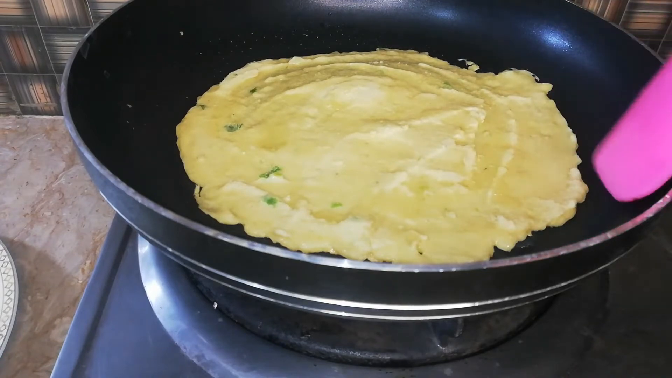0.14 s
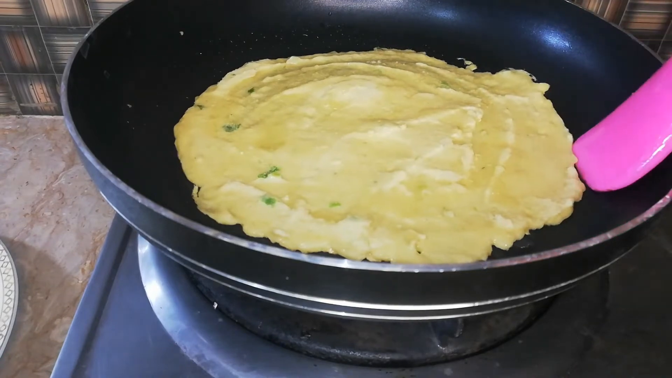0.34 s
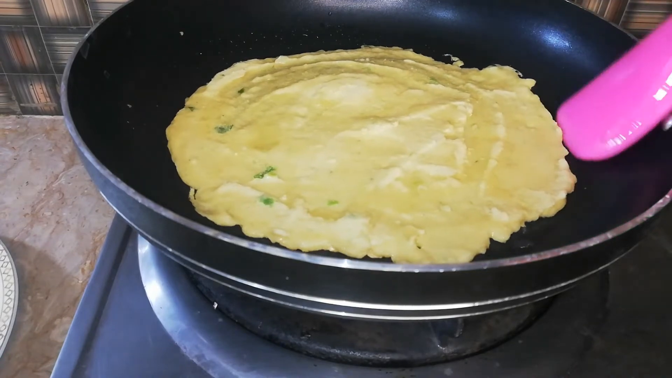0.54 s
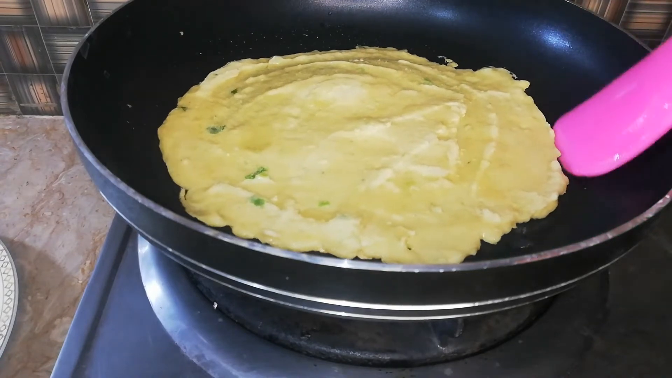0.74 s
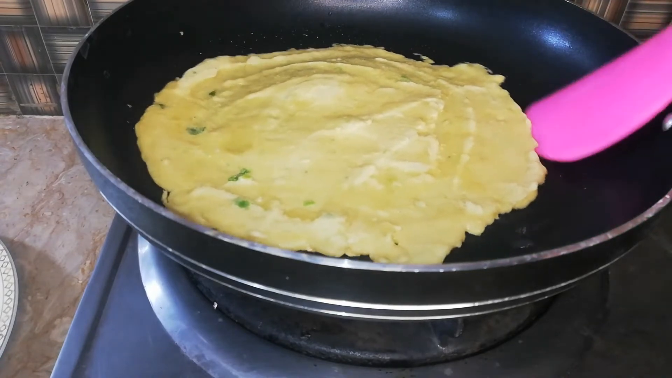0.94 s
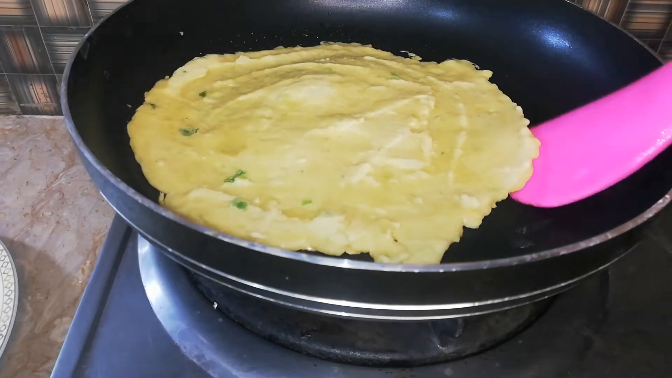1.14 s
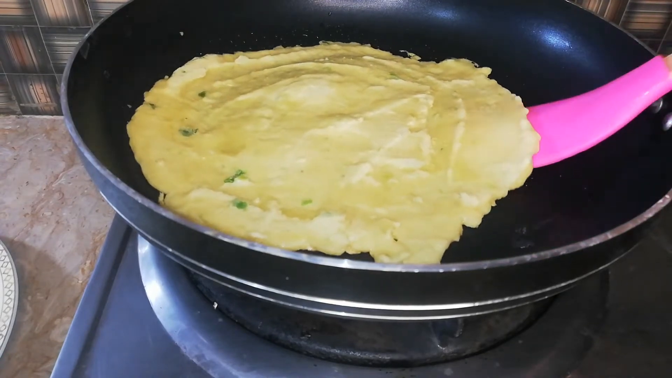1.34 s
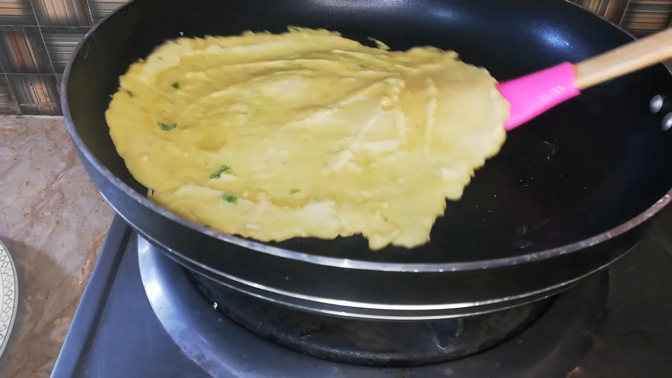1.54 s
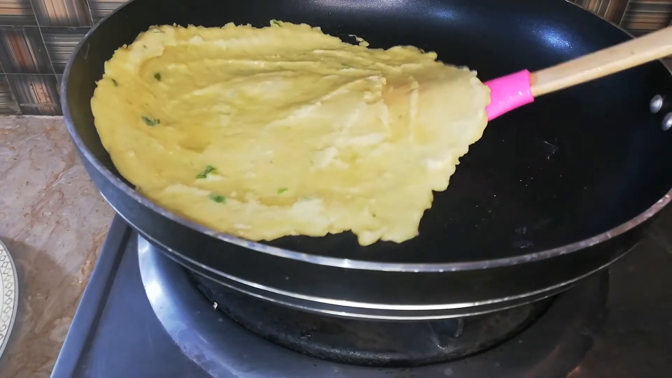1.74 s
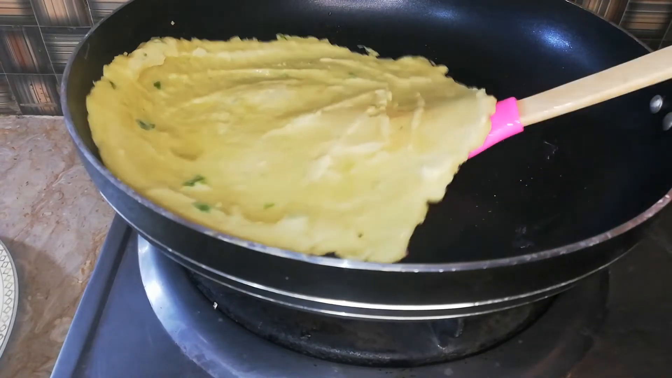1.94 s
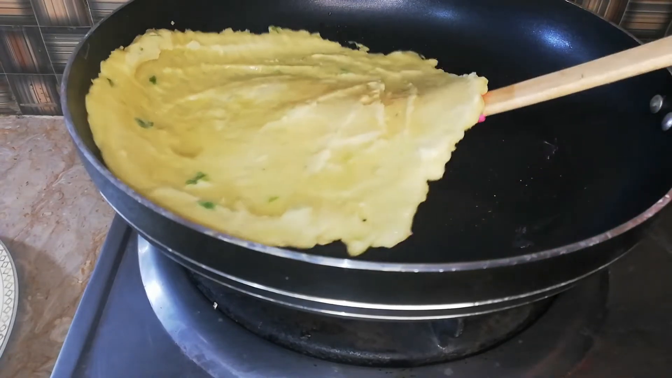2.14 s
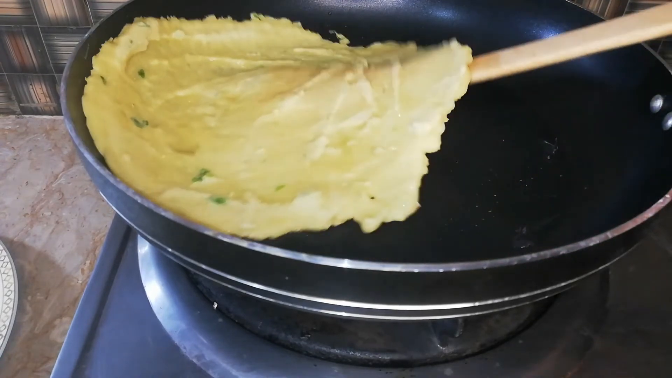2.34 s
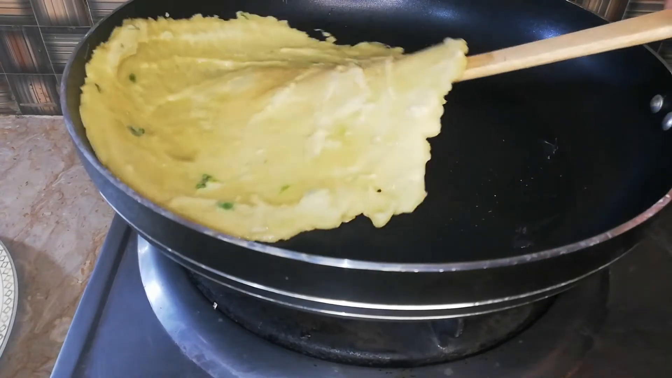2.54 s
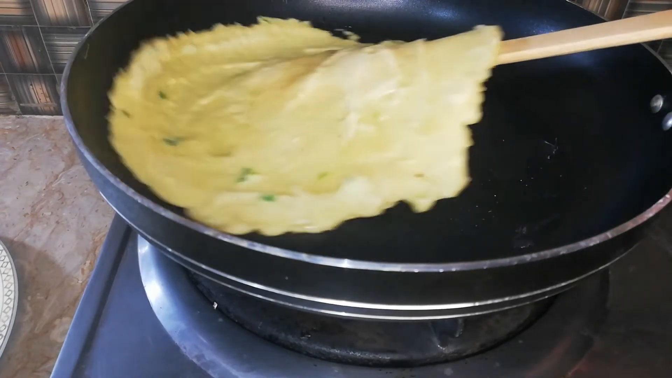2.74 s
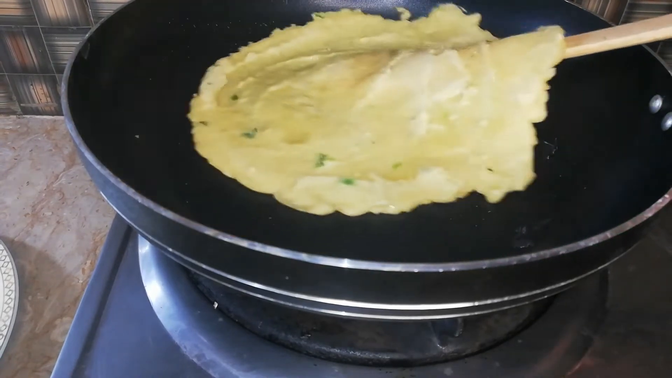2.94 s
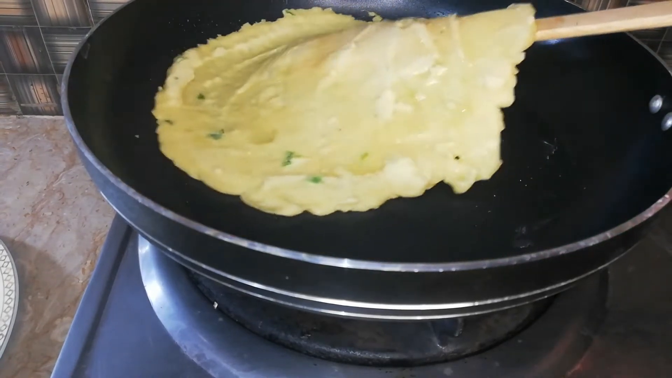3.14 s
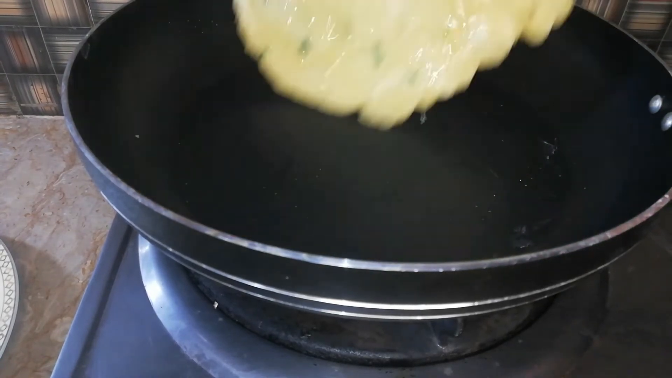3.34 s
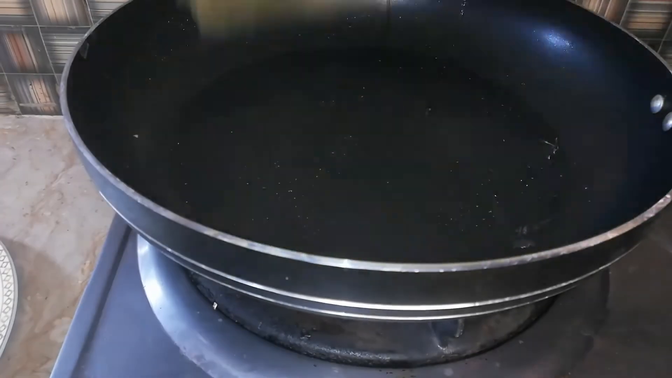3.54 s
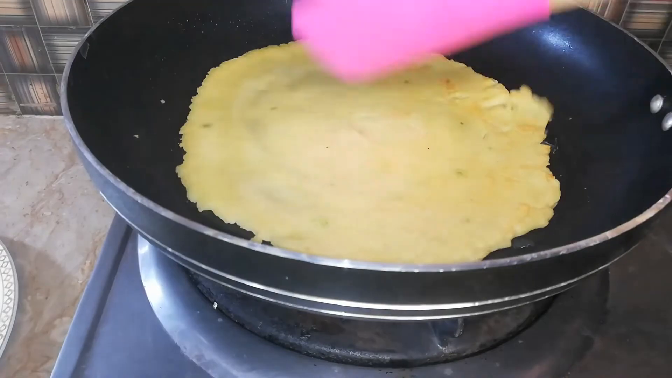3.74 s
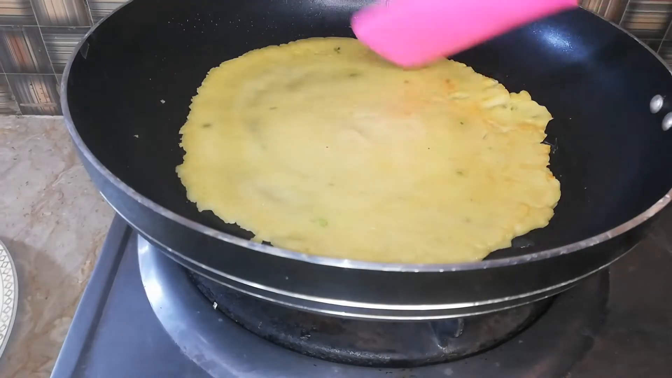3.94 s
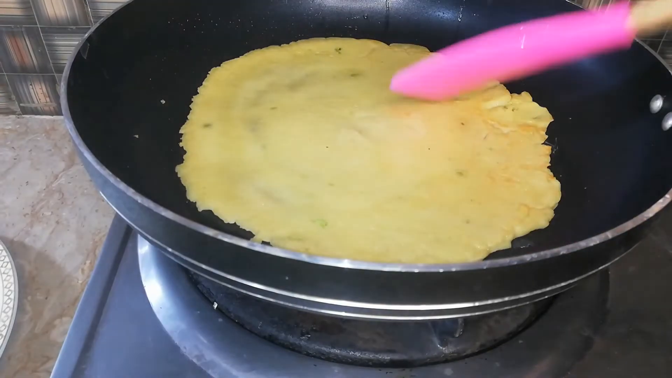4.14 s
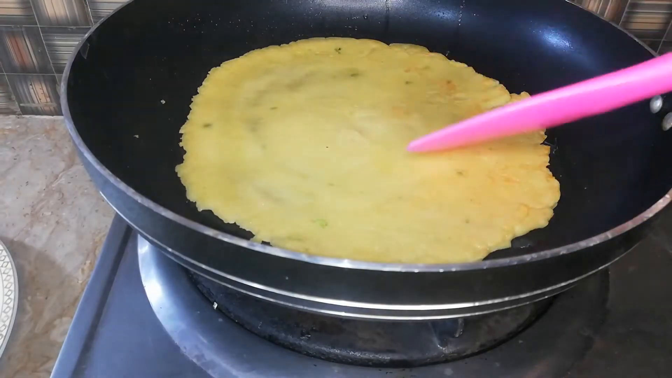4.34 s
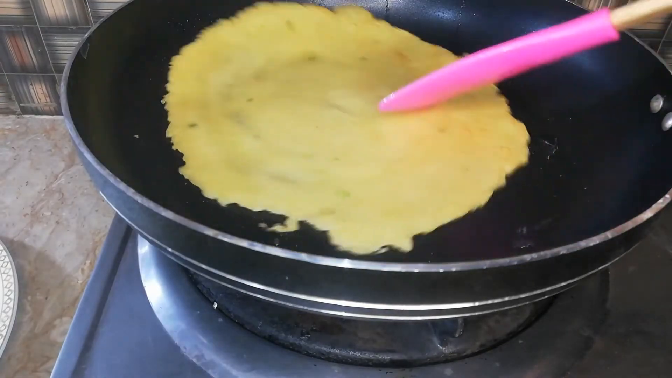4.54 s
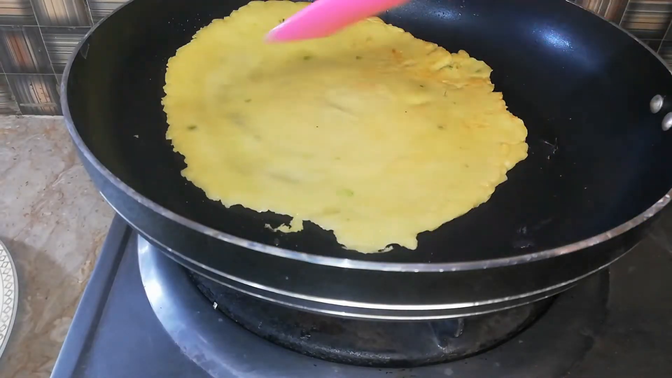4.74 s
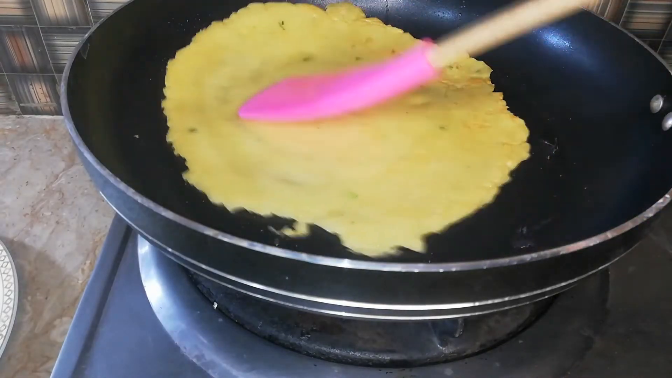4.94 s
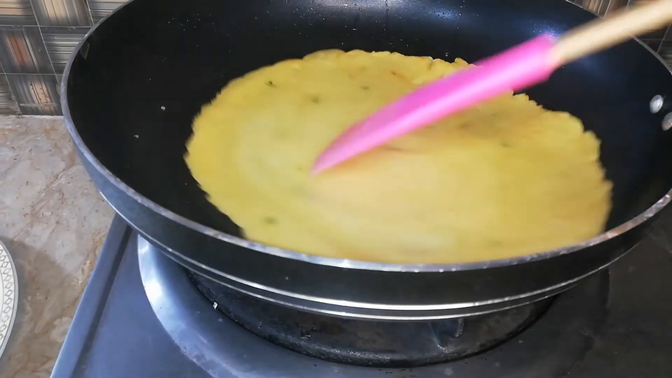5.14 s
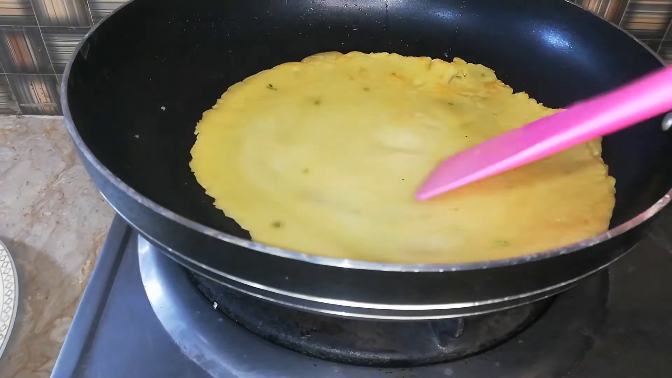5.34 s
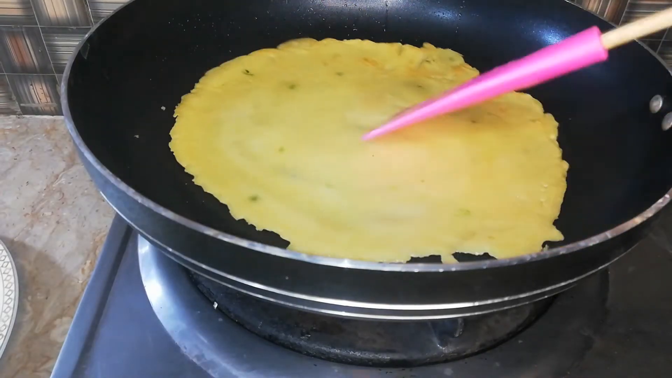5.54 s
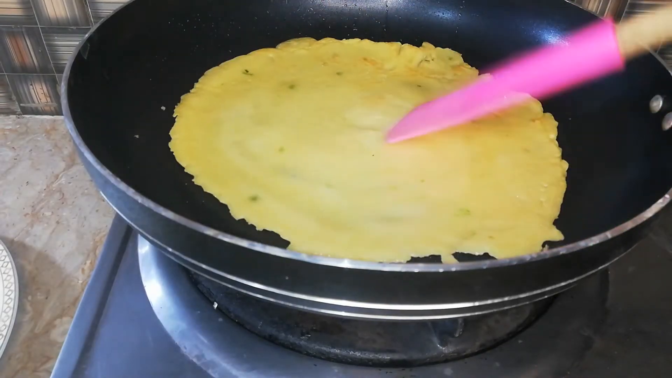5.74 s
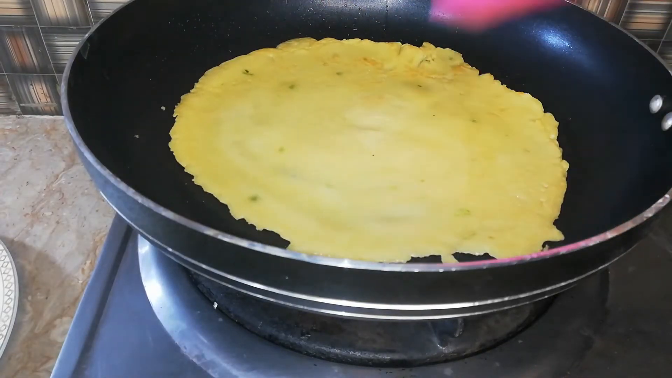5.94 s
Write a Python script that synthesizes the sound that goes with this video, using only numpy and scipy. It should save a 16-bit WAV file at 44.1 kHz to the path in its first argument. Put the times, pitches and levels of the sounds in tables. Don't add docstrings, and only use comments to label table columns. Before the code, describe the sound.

A gas burner runs throughout with low rumble, soft airy hiss and a very thin high whistle, in a small kitchen heard close to the pan. The first 0.9 seconds hold little else. Around 1.0 a soft spatula touches the steel, rubbing, ticking and squeaking, and firm dull tocks cluster from 1.3 to 1.5 as the pan knocks its trivet and rattles the stove. From 1.5 to 3.3 come lighter oily sliding, sharp little spits, a catch near 2.1, a light knock at 2.9 and faint squeals as the crepe lifts. The sizzle dips briefly at 3.4. At 3.6 the crepe slaps down in wet folds, by far the loudest event, with a booming, metallic ring and a puff of steam. Rebound knocks and clinks follow until 3.9, then soft rubbing, faint squeaks, frequent crackling droplets and slowly rising simmer to 6.1.

```python
import sys
import numpy as np
from scipy import signal
from scipy.fft import rfft, irfft, next_fast_len
from scipy.io import wavfile
from scipy.ndimage import uniform_filter1d, map_coordinates

SR = 44100
rng = np.random.default_rng(int(sys.argv[2]) if len(sys.argv) > 2 else 0)


def dump_mix(stems):
    frames = np.atleast_2d(stems).T
    limited = np.clip(frames, -1, 1)
    pcm = np.round(limited * 32767).astype(np.int16)
    wavfile.write(sys.argv[1], SR, pcm)


def ratio_of_db(decibels):
    return 10 ** (np.asarray(decibels, float) / 20)


N = 268569
T = np.arange(N) / SR


def unit(x):
    return x / np.sqrt(np.mean(x ** 2) + 1e-20)


def along(points, hz):
    f, v = np.transpose(points)
    return np.interp(np.log(hz + 1), np.log(f + 1), v)


def curves(rows):
    s, *columns = np.transpose(rows)
    return [np.interp(T, s, column, left=-120) for column in columns]


def wobble(rate, size=N):
    knots = rng.standard_normal(int(size * rate / SR) + 4)
    return map_coordinates(knots, [T[:size] * rate])


def filtered(x, response):
    m = next_fast_len(N + SR // 2)
    return irfft(rfft(x, m) * response(np.fft.rfftfreq(m, 1 / SR)), m)[..., :N]


def ringing(modes, damp):
    def response(f):
        total = 0
        for k, (hz, db, t60) in enumerate(modes):
            width = np.log(1000) / np.pi / (t60 * damp)
            total = total + (-1) ** k * ratio_of_db(db) * 1j * f / (hz * hz - f * f + 1j * f * width)
        return total
    return response


def patches(depth_db):
    z = signal.stft(rng.standard_normal((2, N)), nperseg=512)[2]
    field = uniform_filter1d(rng.standard_normal(z.shape[1:]), size=5, axis=0)
    field = uniform_filter1d(field, size=7, axis=1)
    return signal.istft(z * ratio_of_db(depth_db * unit(field)), nperseg=512)[1][:, :N]


def ports(side, spectrum, grain, patchy_db=0):
    def shape(hz):
        return ratio_of_db(along(spectrum, hz)) * [1 + 0 * hz, ratio_of_db(along(side, hz))]
    mid, diff = filtered(grain * patches(patchy_db), shape)
    return np.array([mid + diff, mid - diff]) / np.sqrt(np.mean(mid ** 2))


def grains(share, spread_db):
    height = np.clip(rng.exponential(size=N), 0, 2.3)
    return 1 + (rng.random(N) < share) * ratio_of_db(spread_db * height)


def bursts(rows, rise):
    out, t = np.zeros(N + SR), np.arange(SR // 2) / SR
    for s, db, t60 in rows:
        out[round(s * SR):][:len(t)] += ratio_of_db(db - 60 * t / t60) * np.clip(t / rise, 0, 1)
    return out[:N]


def swells(rows):
    return sum(ratio_of_db(db - 17 * np.where(T < s, (s - T) / swell, (T - s) / fade)) for s, db, swell, fade in rows)


# frequency [Hz], t60 [s].
ROOM_DECAY = [(200, 0.46), (1500, 0.45), (6000, 0.38), (14000, 0.37)]


def kitchen(x):
    hz, t, z = signal.stft(rng.standard_normal((2, SR // 2)), SR, nperseg=256)
    decay = ratio_of_db(-60 * t / along(ROOM_DECAY, hz)[:, None])
    tail = signal.istft(z * decay, SR, nperseg=256)[1]
    late = np.pad(x, ((0, 0), (130, 0)))
    return signal.fftconvolve(late, tail / np.linalg.norm(tail[0]), axes=1)[:, :N]


# frequency [Hz], side minus mid [dB].
FAR_WIDTH = [(60, -25), (110, -22), (200, -8.5), (380, 1.5), (700, 1), (1290, -8), (2380, -1), (4400, 0.5),
             (8120, 0.5), (15000, 0)]
# frequency [Hz], density [dB per Hz].
RUMBLE_COLOR = [(12, -42), (20, -18), (43, 3.5), (76, -3), (140, -0.5), (233, -19.5), (287, -14.5),
                (404, -16), (462, -24), (536, -39), (700, -19.5), (910, -12), (1540, -120)]
# frequency [Hz], density [dB per Hz].
JET_HISS = [(350, -12.5), (600, -11.5), (1010, -6.5), (1230, -1), (1550, -3.5), (2540, -8), (4280, -8),
            (5330, -7.5), (7020, -6.5), (16000, -19.5)]
# time in seconds [s], level [dB].
SIMMER_LEVEL = [(0, -0.5), (1, 1), (3.3, -0.5), (3.42, -3.5), (3.58, -4), (3.7, -2.5), (6.09, 3.5)]
# pitch [Hz], level [dB].
JET_WHISTLES = [(6046, -74), (5630, -84), (8008, -82)]


def burner():
    whistle = 0
    for hz, db in JET_WHISTLES:
        whistle = whistle + ratio_of_db(db + 2.1 * wobble(7.9)) * np.sin(2 * np.pi * hz * T + .9 * wobble(40))
    rumble = ratio_of_db(-63.5 + 0.98 * wobble(4.29)) * ports(FAR_WIDTH, RUMBLE_COLOR, 1)
    hiss_db = -60 + curves(SIMMER_LEVEL)[0] + .3 * wobble(3)
    hiss = ratio_of_db(hiss_db) * ports(FAR_WIDTH, JET_HISS, 1, patchy_db=1.5)
    return rumble + hiss + whistle


# pitch [Hz], level [dB], t60 [s].
STOVE_MODES = [(68.4, -10.5, 0.93), (95.7, -6.5, 1), (157.8, 0, 0.5), (184, 2, 0.24), (228.4, 1.5, 0.38),
               (269.6, -5, 0.99), (312.6, -3.5, 0.26), (408.4, -6.5, 0.6), (500, -23, 0.28)]


def stove(push, damp):
    return filtered(push, ringing(STOVE_MODES, damp))


# peak time [s], peak level [dB], swell [s], fade [s].
JOLT_MOVES = [(.2, -65, 0.14, 0.18), (1.08, -59, 0.085, 0.061), (1.34, -48, 0.068, 0.14),
              (1.45, -43, 0.18, 0.096), (2.43, -85, 0.38, 0.16), (2.69, -57, 0.018, 0.089),
              (2.97, -55.5, 0.09, 0.047), (3.45, -63, 0.031, 0.016), (3.61, -32.5, 0.0047, .11),
              (3.72, -43.5, .03, 0.075), (3.845, -44, 0.019, 0.092), (4.04, -54.5, 0.02, 0.043),
              (4.49, -67, 0.063, 0.034), (4.64, -57.5, 0.034, 0.032), (4.85, -64, 0.064, 0.19),
              (5.35, -58, 0.054, 0.3), (5.78, -66, 0.26, 0.22)]


def shaking():
    level = ratio_of_db(-70.5 + 4.4 * wobble(4.66)) + swells(JOLT_MOVES)
    return ratio_of_db(-6) * level * unit(stove(rng.standard_normal(N), damp=0.3))


# start [s], peak level [dB], pitch [Hz], left minus right [dB].
OIL_SPITS = [(0.538, -45, 6100, 4), (1.5091, -36.5, 5300, 4), (1.5616, -42, 9200, 7),
             (1.8364, -38, 8600, 8), (1.9926, -43, 9500, 9), (2.1017, -29, 11200, -9),
             (2.2008, -34.5, 7400, 6), (2.343, -39.5, 7300, 10), (2.5919, -38, 9000, 3.5),
             (2.6495, -38, 7200, -4), (2.6927, -39, 5300, -6), (2.7355, -42, 5300, -5),
             (3.103, -41, 7800, 7), (3.7689, -35, 7500, 6), (3.8057, -31.5, 7050, 5),
             (3.8548, -35, 5000, 7), (3.9757, -36, 7980, 6), (4.2446, -41, 7100, 3), (4.4005, -38, 7800, 4),
             (4.4827, -31.5, 7200, 7), (4.5747, -44, 8400, 8), (4.589, -42, 10800, 7),
             (4.5931, -43, 8600, 9), (4.712, -43, 9600, -2), (4.7706, -41, 5600, 2), (4.7783, -45, 5400, 9),
             (4.8087, -39.5, 10000, 5), (4.816, -39, 9500, 9), (4.8306, -44, 6500, 8),
             (4.9055, -41, 3300, -2), (4.9204, -41, 3400, 0), (4.9654, -43, 7600, -4),
             (5.0442, -37, 7800, 8), (5.0645, -40, 8500, 9), (5.2175, -36.5, 8460, 9),
             (5.3083, -41, 7300, 8), (5.3375, -42, 8200, 4), (5.424, -38, 9500, 7), (5.5385, -38, 9640, 0),
             (5.5517, -36, 8000, 3), (5.5913, -33.5, 9600, 4), (5.6379, -38, 5800, 2),
             (5.6744, -42, 6800, 3), (5.7357, -41, 5200, 10), (5.8005, -41, 7100, 0),
             (5.8103, -35, 5900, -3), (5.8179, -39, 7700, 4), (5.8914, -39.5, 7800, 7),
             (5.9339, -38.5, 6000, -2), (6.073, -41, 7200, 1)]
# start [s], peak level [dB], pitch [Hz].
OIL_MIST = [(1.407, -35, 6900), (1.577, -46, 7200), (1.6434, -40, 3280), (1.9296, -37, 7600),
            (2.7505, -40, 3000), (2.884, -35, 4500), (4.1421, -46, 7700), (4.393, -41, 4700),
            (4.5625, -44, 7300), (4.9741, -42, 7800), (5.2442, -38, 3000), (5.3034, -42, 8400),
            (5.5945, -42, 9500), (5.7235, -46, 7800)]


def spits():
    out, t = np.zeros((2, N + 400)), np.arange(300) / SR
    for s, db, hz, pan_db in [*OIL_SPITS, *[(*row, 3) for row in OIL_MIST]]:
        click = np.cos(2 * np.pi * hz * t + rng.uniform(-1, 1, (2, 1))) * ratio_of_db(-60 * t / .0019)
        spray = .3 * rng.standard_normal((2, len(t))) * ratio_of_db(-60 * t / .006)
        gain = ratio_of_db(db + 5.5 + np.array([[.5], [-.5]]) * pan_db)
        out[:, round(s * SR):][:, :len(t)] += gain * (click + spray)

    def wall_echo(f):
        echoes = 1 + .25 * np.exp(-2j * np.pi * f * .00088) + .25 * np.exp(-2j * np.pi * f * .0032)
        return echoes * (1j * f / (3000 + 1j * f)) ** 2 / (1 + 1j * f / 16000)
    return filtered(out[:, :N], wall_echo)


# frequency [Hz], side minus mid [dB].
NEAR_WIDTH = [(60, -22.5), (110, -20), (200, 1), (380, 12.5), (700, 3), (1290, -5.5), (2380, 1.5),
              (4400, -0.5), (8120, -0.5), (15000, 1)]
# start [s], peak level [dB], pitch [Hz], low ring [dB], edge [dB].
PAN_KNOCKS = [
    (0.975, -47.5, 1080, -46, -6),
    (1.317, -29.5, 860, -19, -19),
    (1.376, -26, 890, -22, -1.5),
    (1.429, -22.5, 890, -18.5, -9),
    (1.477, -32, 800, -19, -4),
    (2.906, -39, 850, -17, -17),
    (3.717, -35, 880, -10, -14),
    (3.776, -38, 2240, -40, -14),
    (3.835, -26.5, 890, -30, -8),
    (4.029, -49.5, 685, -12, 2),
]
# frequency [Hz], density [dB per Hz].
RATTLE_COLOR = [(250, -30), (400, -4), (850, 9), (1300, 0), (2500, -25), (5000, -44)]


def knocks():
    tock, push, t = np.zeros(N), np.zeros(N), np.arange(2000) / SR
    for s, db, hz, low_db, edge_db in PAN_KNOCKS:
        body = ratio_of_db(db + 5.5 - 60 * t / .009) * np.sin(2 * np.pi * hz * t)
        edge = ratio_of_db(db + edge_db + 11 - 60 * t / .004) * np.sin(2 * np.pi * 1.6 * hz * t)
        tock[round(s * SR):][:len(t)] += (body + edge) * (1 - np.exp(-t / 0.0008))
        push[round(s * SR)] = ratio_of_db(db + low_db + 64.5)
    shake = bursts([(s, db, .11) for s, db, *_ in PAN_KNOCKS], rise=.004)
    rattle = ratio_of_db(-16) * shake * ports(NEAR_WIDTH, RATTLE_COLOR, 1)
    return tock * ratio_of_db([[-1.4], [1.4]]) + rattle, push


# pitch [Hz], level [dB], t60 [s].
PAN_MODES = [(752, -3, .3), (887, -9, .25), (1056, -4, .25), (1190, -3, .3), (1348, -3, .25),
             (1655, -3, .25), (2040, -6, .24), (2300, -11, .2), (2718, -8, .22), (2830, -10, .2),
             (3370, -10, .18), (3610, -5, .2), (4520, -10, .18), (5400, -14, .12)]


def pan_wall(x, damp):
    return filtered(x, ringing(PAN_MODES, damp))


LAND_S = 3.594
GONG_HZ = [96, 182, 227, 307, 404, 746, 1056, 1185, 1345, 1652, 2040, 2722, 3604, 4515]
# level [dB], t60 [s], left minus right [dB], swell [s].
GONG_RINGS = [(-45, .9, 0, .04), (-36, .42, 0, .014), (-31, .4, 0, .03), (-33, .28, 3, .01),
              (-33, .26, -1, .006), (-29, .18, -5, .003), (-29, .14, 6, .003), (-33, .17, -2, .002),
              (-32, .16, -2, .002), (-31, .16, -3, .003), (-28, .17, 3, .003), (-29, .11, -6, .001),
              (-33, .15, 0, .002), (-38, .17, 0, .002)]


def gong():
    t = np.clip(T - LAND_S, 0, None)[:round((LAND_S + 1) * SR)]
    side = np.array([[.5], [-.5]])
    ring = 0
    for hz, (db, t60, pan_db, swell) in zip(GONG_HZ, GONG_RINGS):
        level = ratio_of_db(db - 60 * t / t60 + side * pan_db) * (1 - np.exp(-t / swell))
        ring = ring + level * np.sin(2 * np.pi * hz * t + side * hz / 2000)
    return np.pad(ring, ((0, 0), (0, N - len(t))))


# start [s], peak level [dB], t60 [s].
FOLDS = [
    (3.595, -29, 0.026),
    (3.595, -24, 0.056),
    (3.593, -25.5, 0.059),
    (3.605, -37, 0.019),
    (3.606, -25, 0.015),
    (3.623, -47, 0.068),
]
# frequency [Hz], density [dB per Hz].
SPLAT_COLOR = [(180, -17), (300, -4), (546, -3), (737, -5), (842, -3.5), (2030, 2.5), (2170, -2.5),
               (7690, -11), (16000, -29.5)]


def slap():
    folds = bursts(FOLDS, rise=0.00041)
    batter = ports(NEAR_WIDTH, SPLAT_COLOR, grains(0.0043, spread_db=2.0), patchy_db=-2.5)
    splat = ratio_of_db(-11.0) * folds * batter
    steam = bursts([(LAND_S, -32.5, 0.24)], rise=0.0032) * batter
    wall = ratio_of_db(45) * pan_wall(splat, damp=.14)
    blow = ratio_of_db(16.0) * folds * rng.standard_normal(N)
    return (splat + steam + wall) * ratio_of_db([[-.9], [.9]]), blow


# start
# [s], peak level [dB], pitch [Hz].
STEEL_TICKS = [(.998, -37, 2710), (.9755, -43, 2790), (1.0425, -40, 2000), (1.214, -43, 2400),
               (1.237, -33, 1700), (1.2376, -37, 4600), (1.097, -37, 3300), (1.075, -41, 2630),
               (1.095, -36, 1790), (1.102, -34, 2700), (1.148, -42, 3800), (1.159, -43, 1970),
               (1.255, -37, 1960), (1.2553, -37, 3300), (2.1415, -42, 2500), (2.204, -40, 2000),
               (2.221, -40, 2200), (2.394, -43, 1900), (1.306, -36, 3200), (1.738, -41, 1700),
               (2.1015, -32, 2000), (2.648, -46, 1510), (3.137, -46, 3570), (3.7755, -36, 2900),
               (3.9425, -39, 2000), (5.5125, -42, 3000), (2.816, -47, 2220), (3.5965, -28, 2040),
               (3.595, -27, 2900), (3.5988, -17, 1050), (3.6067, -19, 1100), (3.6015, -28, 900),
               (3.613, -28, 1700), (3.5925, -33, 4800), (2.109, -36, 5000)]


def ticks():
    out, t = np.zeros((2, N)), np.arange(900) / SR
    for s, db, hz in STEEL_TICKS:
        turn = 2 * np.pi * hz * t + [[0], [1.3]]
        level = ratio_of_db(db - 60 * t / .011) * (1 - np.exp(-t / .0003))
        out[:, round(s * SR):][:, :len(t)] += level * (np.sin(turn) + .5 * np.sin(1.49 * turn))
    return out


# start [s], end [s], pitch [Hz], width [Hz], level [dB].
STEEL_SQUEALS = [(2.11, 2.19, 4800, 600, -63), (2.265, 2.3, 5280, 250, -54), (2.84, 2.93, 3620, 150, -59),
                 (3.13, 3.16, 3600, 100, -62), (3.18, 3.23, 3620, 100, -59), (3.14, 3.3, 3600, 250, -65),
                 (3.21, 3.29, 2900, 120, -60), (3.14, 3.2, 2250, 100, -64), (3.2, 3.235, 2000, 100, -64),
                 (3.17, 3.33, 840, 50, -67), (3.295, 3.405, 2300, 40, -65), (3.28, 3.38, 6950, 300, -71),
                 (4.82, 5.16, 408, 30, -76), (5.07, 5.17, 2770, 250, -60), (5.15, 5.22, 2870, 250, -59),
                 (5.2, 5.27, 2780, 300, -61), (5.235, 5.255, 2950, 300, -58), (2.27, 2.3, 4300, 300, -62),
                 (3.27, 3.315, 2050, 100, -65), (4.98, 5.17, 3520, 180, -63), (5.27, 5.46, 220, 25, -71),
                 (1.85, 2.6, 410, 25, -77), (2.2, 2.3, 1680, 250, -60), (4.18, 4.23, 2050, 200, -62),
                 (2.83, 2.92, 2900, 200, -64), (.99, 1.1, 2700, 600, -64), (1.095, 1.125, 1750, 350, -54),
                 (1.232, 1.27, 4600, 300, -55), (1.23, 1.31, 2800, 300, -55), (1.34, 1.44, 4600, 250, -59),
                 (1.42, 1.5, 3350, 300, -60), (1.235, 1.27, 3300, 300, -55), (1.23, 1.265, 1750, 300, -56),
                 (1.335, 1.39, 1950, 300, -56), (1.335, 1.38, 2750, 300, -58), (2.85, 2.9, 1700, 200, -65),
                 (3.17, 3.22, 8600, 150, -69), (4.93, 5.0, 2700, 120, -67), (4.93, 5.32, 1260, 400, -66),
                 (1.12, 1.19, 3300, 300, -61)]


def squeals():
    out = np.zeros((2, N))
    for start, end, hz, wide_hz, db in STEEL_SQUEALS:
        n = round((end - start) * SR)
        swell = np.sqrt(np.sin(np.pi * np.arange(n) / n)) * ratio_of_db(db + 2 * wobble(40, size=n))
        broken = ratio_of_db(3 + 3.5 * wobble(wide_hz, size=n))
        turn = 2 * np.pi * hz * T[:n] + 1.6 * wobble(wide_hz, size=n)
        out[:, round(start * SR):][:, :n] += swell * broken * np.sin(turn + [[0], [1.2]])
    return out


# time [s], pressure [dB], oiliness as fizz over rub [dB].
STEADY_DRAG = [(.8, -81, -2), (.95, -67, -4), (1.0, -54.5, -9), (1.2, -55.5, -12), (1.3, -53, -3),
               (1.47, -50.5, -14), (1.5, -60, 4), (1.68, -60, -3), (2.5, -56.5, 1), (2.72, -62, 0),
               (3.33, -63.5, -1.5), (3.4, -81, 6), (3.7, -60, -7), (3.79, -51.5, 0), (4.1, -56, 1.5),
               (4.6, -57.5, -3.5), (4.85, -58, -10), (6.09, -59.5, -3)]
# peak time [s], peak level [dB], swell [s], fade [s], oiliness [dB].
SPATULA_PUSHES = [(1.099, -50.5, 0.006, 0.062, -7), (1.158, -62.5, 0.017, 0.024, -10),
                  (1.245, -49, 0.016, 0.044, -9), (1.42, -49.5, 0.22, 0.047, -6),
                  (1.641, -58.5, 0.01, 0.053, 5.5), (1.93, -55, 0.27, 0.05, 3.5),
                  (2.03, -59, 0.033, 0.035, 3), (2.106, -50.5, 0.054, 0.07, 8),
                  (2.22, -52, 0.014, 0.033, -4), (2.28, -53.5, 0.025, 0.038, 6),
                  (2.415, -54, 0.019, 0.021, -5), (2.88, -52, 0.17, 0.086, 1.5),
                  (3.02, -60, 0.073, 0.033, -13), (3.22, -58, 0.19, 0.15, 5.5),
                  (3.68, -58.5, 0.035, .03, 4), (3.771, -54, 0.014, 0.016, -5), (3.97, -59, 0.02, 0.1, 0),
                  (4.4, -63.5, 0.079, 0.051, 6), (4.485, -63, 0.005, 0.043, 9), (5.08, -58, 0.25, 0.3, 4),
                  (5.27, -67.5, 0.11, 0.16, 9), (5.43, -58.5, 0.035, 0.11, 3), (5.51, -60, 0.014, 0.035, 5),
                  (5.81, -68, .02, 0.032, 7)]
# start [s], peak level [dB], t60 [s], fizz [dB].
BLADE_CATCHES = [(0.995, -42, 0.041, -33), (1.097, -43, 0.038, -22), (1.237, -29, 0.039, -16),
                 (1.254, -33, 0.057, -27), (1.305, -32, 0.022, -20), (1.3435, -39, 0.1, -26),
                 (1.6297, -55, 0.05, -17), (1.7375, -42, 0.12, -14.5), (2.1012, -34, .04, 5),
                 (4.4808, -42, .009, 22), (5.591, -48, .012, 20), (3.7685, -46, .012, 18),
                 (2.2013, -45, 0.05, -9), (2.3935, -38, 0.1, -16), (3.665, -23, 0.047, -17),
                 (3.776, -33, 0.014, -20), (3.854, -41, 0.052, 12), (4.391, -49, 0.029, -9)]
# frequency [Hz], density [dB per Hz].
RUB_COLOR = [(350, -64), (600, -11), (736, -10), (1240, -2), (2210, 0.5), (2770, 0.5), (3070, -2),
             (3510, 0.5), (3800, -1.5), (9000, -11), (11700, -38), (19800, -120)]
# frequency [Hz], density [dB per Hz].
FIZZ_COLOR = [(1760, -39), (3000, -9), (3520, -9), (3860, -1), (4930, 2), (7780, 2.5), (11200, -4.5),
              (16000, -11.5)]


def sliding():
    drag_db, oil_db = curves(STEADY_DRAG)
    press = ratio_of_db(drag_db) + swells([row[:-1] for row in SPATULA_PUSHES])
    oily_pushes = [(s, db + more_db, swell, fade) for s, db, swell, fade, more_db in SPATULA_PUSHES]
    oily = ratio_of_db(drag_db + oil_db) + swells(oily_pushes)
    stick = 0.57 * wobble(30)

    rub = ports(NEAR_WIDTH, RUB_COLOR, grains(.012, spread_db=7.0), patchy_db=1.5)
    rub = rub + .45 * unit(pan_wall(rub, damp=.22))
    fizz = ports(FAR_WIDTH, FIZZ_COLOR, grains(.006, spread_db=6.5), patchy_db=2.5)

    rub_catch = bursts([(s, db, t60) for s, db, t60, _ in BLADE_CATCHES], rise=0.0007)
    fizz_catch = bursts([(s, db + top_db, t60) for s, db, t60, top_db in BLADE_CATCHES], rise=.0015)
    rub_gain = press * ratio_of_db(-2.0 + stick) + ratio_of_db(-15.0) * rub_catch
    fizz_gain = oily * ratio_of_db(-3.0 + stick + 1.1 * wobble(60)) + ratio_of_db(-27.0) * fizz_catch
    return rub_gain * rub + fizz_gain * fizz


def scene():
    tock, push = knocks()
    splat, blow = slap()
    boom = stove(push + blow, damp=0.94) + shaking()
    hits = splat + spits() + ticks() + tock + boom * ratio_of_db([[-.25], [.25]])
    room = kitchen(hits)
    middle = room.mean(0)
    room = middle + filtered(room - middle, lambda f: f / (f + 120))
    return burner() + hits + ratio_of_db(-5.5) * room + gong() + squeals() + sliding()


def top_cut(x):
    return signal.sosfilt(signal.butter(12, 15800, fs=SR, output="sos"), x)


def record(dry):
    mix = filtered(dry, lambda hz: hz < 15900)
    return top_cut(mix)


dry = scene()
out = record(dry)
dump_mix(out)
```